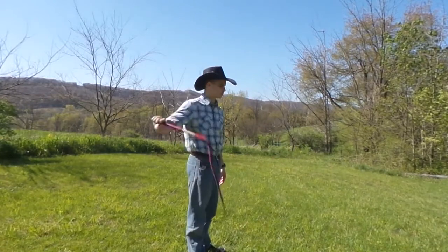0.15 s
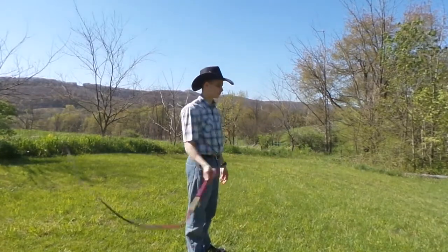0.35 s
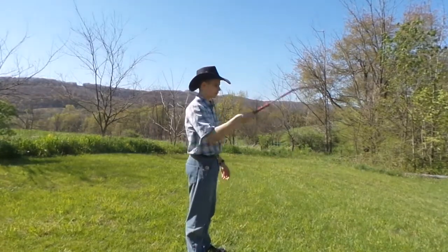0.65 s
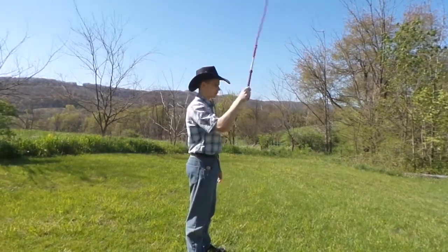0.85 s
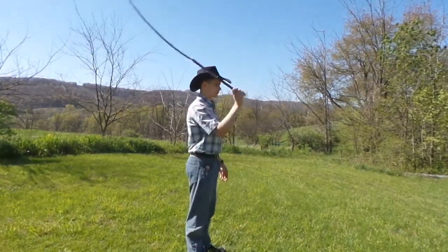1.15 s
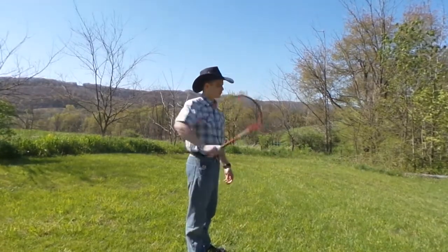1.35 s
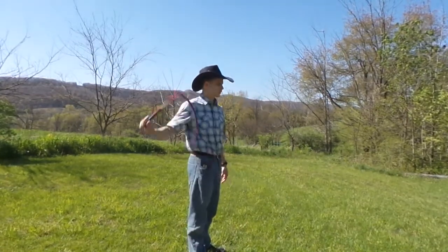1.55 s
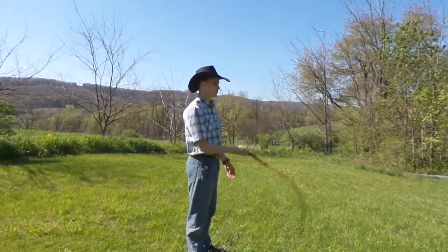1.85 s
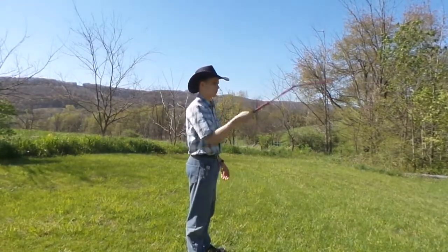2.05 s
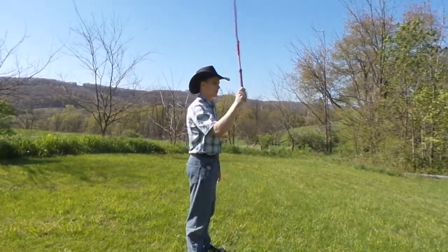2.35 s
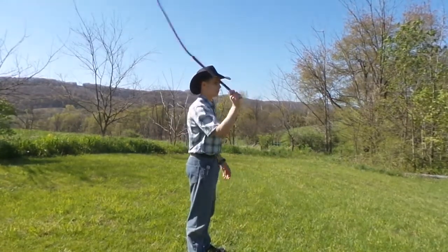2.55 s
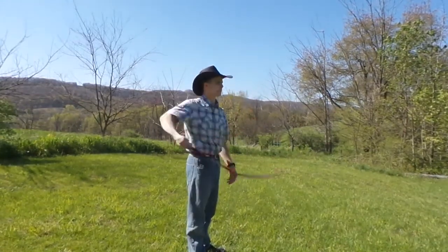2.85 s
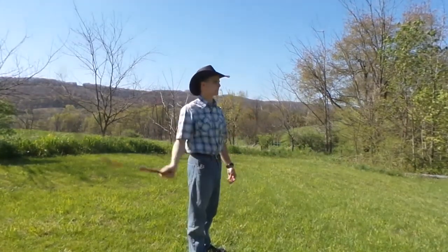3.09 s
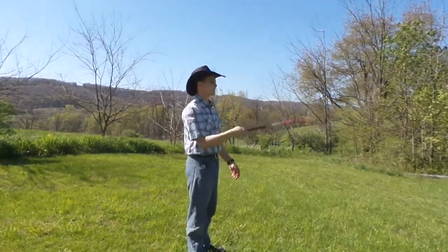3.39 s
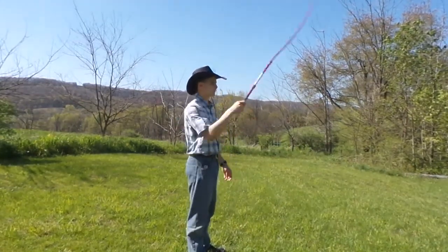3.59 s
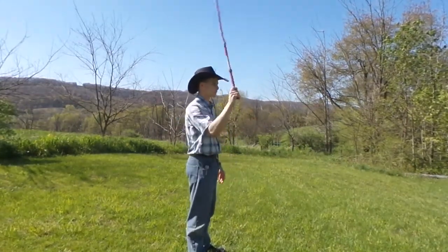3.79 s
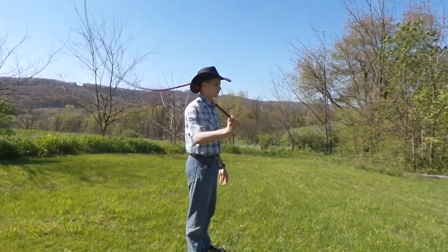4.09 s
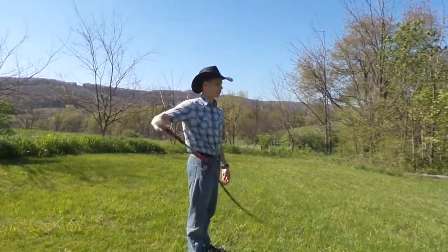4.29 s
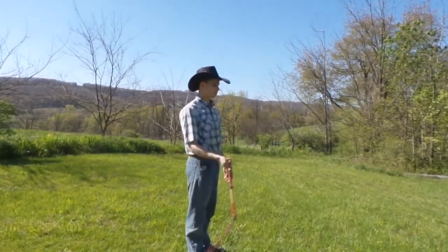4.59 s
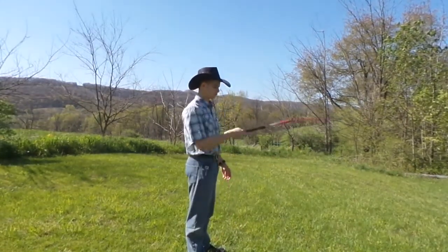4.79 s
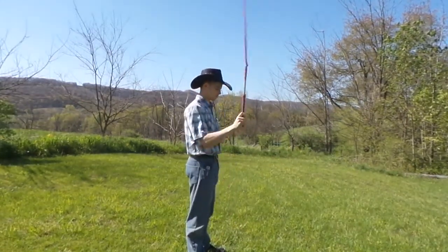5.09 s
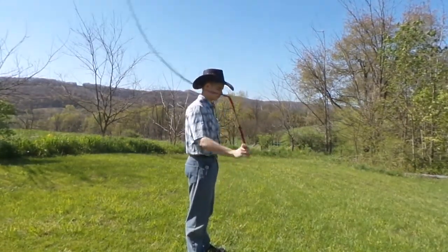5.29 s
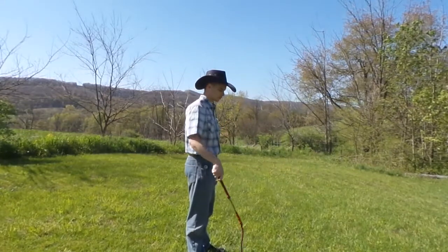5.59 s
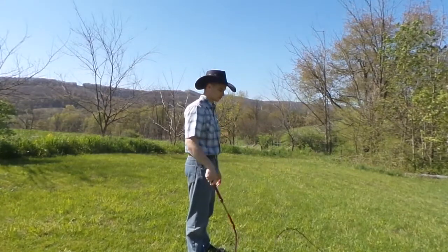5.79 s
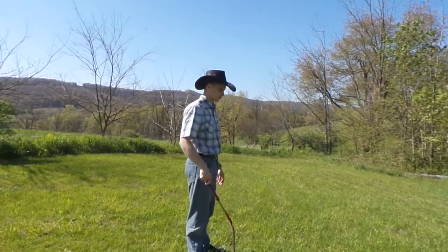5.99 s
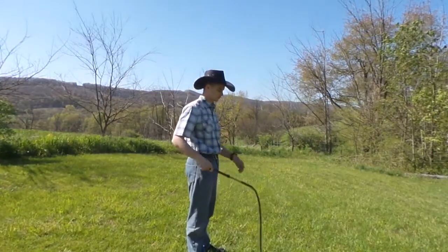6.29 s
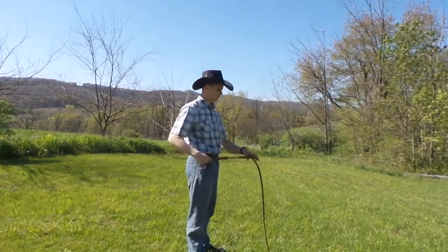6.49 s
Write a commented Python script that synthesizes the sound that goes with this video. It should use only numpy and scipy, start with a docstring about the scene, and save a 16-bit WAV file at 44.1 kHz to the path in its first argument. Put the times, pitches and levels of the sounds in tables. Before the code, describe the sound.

Pairs of sharp whip cracks with brief swishes and short echoes ring out in a breezy meadow over low, gusty wind rumble.

```python
"""In a breezy meadow, a long whip gives four pairs of cracks, behind then ahead, and a last soft one.
The thong (the whip's long cord) whistles through the air, and its tip makes a shock wave: the crack.
The ground, the grass and the tree lines send each crack back as a spray of small echoes.
Gusts rumble and pop against the microphone all the while. Near the end, clothes and thong rustle."""
import sys
import numpy as np
from scipy import signal
from scipy.fft import rfft, irfft
from scipy.io import wavfile
from scipy.ndimage import uniform_filter1d, map_coordinates

SR = 44100
rng = np.random.default_rng(int(sys.argv[2]) if len(sys.argv) > 2 else 0)


def persist_wave(psi):
    """Save psi, clipped to +-1, as 16-bit WAV."""
    counts = np.round(np.clip(psi, -1, 1) * 32767).astype(np.int16)
    wavfile.write(sys.argv[1], SR, np.atleast_2d(counts).T)


N = 293088

# A colour says how strong the low and high parts of a sound are.
# Each row: frequency in Hz, relative level in dB.
MEADOW_COLOUR = [(30, 6), (300, -2), (800, -7.5), (1500, -11), (3000, -29.5), (5000, -31), (9000, -30),
                 (12500, -29), (16000, -35.5)]  # the quiet of the meadow
FAR_HISS_COLOUR = [(1000, 0.5), (2200, 3), (4000, -6), (8000, -17), (16000, -23.5)]  # a distant hiss
RUMBLE_COLOUR = [(15, -19), (28, -12.5), (42, -11), (70, 2), (125, 5.5), (200, 0), (290, -10.5),
                 (420, -30.5), (800, -47), (2000, -79)]  # the deep part of the wind
FLUTTER_COLOUR = [(150, -8.5), (280, 9), (380, 3), (550, -8), (800, -17), (1200, -30.5), (2000, -48),
                  (4000, -77.5), (8000, -96)]  # the higher part of the wind
HISS_COLOUR = [(1500, -1.5), (3000, 6.5), (6000, 3.5), (9000, 3.5), (12500, 9.5), (16000, -5.5)]  # the whip's hiss and the rustle
TICK_COLOUR = [(1500, -9), (3500, 2), (7000, -9), (14000, -21)]  # a dry tick
RUSH_COLOUR = [(1000, -2), (2200, 4), (3200, -7), (5000, -12), (8000, -11), (12500, -5.5), (16000, -15.5)]  # air rushing past the thong
ECHO_COLOUR = [(300, -9.5), (800, -7), (1500, -0.5), (3000, 1.5), (5000, 3), (8000, -1.5), (10000, 3),
               (12500, 1.5), (15500, -5)]  # echoes from the land
SNAP_COLOUR = [(300, -16.5), (1000, -2), (2000, -6.5), (3500, -32), (6500, -8), (9500, -3), (12500, 2.5),
               (14500, -3), (16000, -19)]  # the snap of the frayed tip

# The far hiss swells and fades. Each row: time in seconds, level in dB.
FAR_HISS_LEVELS = [(0, -84.5), (2.4, -79.5), (2.9, -66), (3.9, -70), (4.35, -63), (5.1, -86.5), (6.65, -84)]
# The rustle as the whip is gathered. Each row: time in seconds, level in dB.
RUSTLE_LEVELS = [(5.85, -88), (6.0, -68.5), (6.15, -68.5), (6.21, -61), (6.27, -68), (6.32, -63),
                 (6.42, -78), (6.54, -63.5), (6.65, -78)]
# Gusts and lulls. Each row: time in seconds, then relative levels of rumble and flutter in dB.
GUSTS = [(0.0, -15, -31), (0.06, -22.5, -29.5), (0.09, -26.5, -34.5), (0.22, -31, -37.5),
         (0.31, -14.5, -20.5), (0.34, -19, -37), (0.39, -11, -13), (0.57, -18, -31), (0.84, -17.5, -28),
         (1.01, -10.5, -21), (1.3, -13, -15.5), (1.37, -27.5, -49), (1.46, -5, -11.5), (1.49, -12.5, -29.5),
         (1.65, -17.5, -27.5), (1.68, -25.5, -55), (1.87, -27.5, -24.5), (1.93, -18.5, -23.5),
         (2.0, -29, -39), (2.02, -15, -20.5), (2.1, -14, -17), (2.19, -22.5, -38.5), (2.31, -36.5, -47),
         (2.35, -22, -22.5), (2.43, -31, -35.5), (2.44, -39.5, -54.5), (2.47, -23, -17), (2.61, -20, -24),
         (2.66, -23, -41), (2.78, -17, -24), (2.83, -33, -48), (2.85, -17.5, -30), (2.93, -23.5, -41),
         (2.99, -12, -25.5), (3.35, -30.5, -45), (3.57, -20, -28), (3.7, -19, -31), (3.8, -31, -48),
         (3.86, -13.5, -19.5), (3.91, -33.5, -35), (4.04, -25, -34.5), (4.11, -29.5, -48.5),
         (4.17, -9.5, -22.5), (4.27, -29.5, -41.5), (4.31, -5, -19), (4.46, -37, -35.5), (4.52, -5.5, -15),
         (4.58, -17.5, -22), (4.9, -15, -11.5), (5.3, -23.5, -38), (5.33, -38, -55), (5.35, -18.5, -33),
         (5.39, -27.5, -47.5), (5.53, -9.5, -19), (5.6, -26, -44), (5.72, -14, -31.5), (5.89, -18, -24),
         (5.99, -25, -47), (6.11, -9, -16), (6.17, -27.5, -48), (6.41, -3.5, -15), (6.56, -19, -39.5),
         (6.59, -1.5, -11.5), (6.64, -17, -17.5)]
# The hardest eddies (small whirls of air). Each row: time in seconds, level in dB, core size in ms.
HARD_EDDIES = [(0.058, -7.5, 1.7), (0.293, -6, 1.2), (0.382, -7.5, 0.94), (0.645, -9.5, 0.83),
               (0.741, -16, 0.66), (0.967, -23, 0.37), (1.045, -7.5, 1.04), (1.278, -2.5, 1.2),
               (1.435, -15.5, 0.78), (2.029, -5.5, 1.7), (2.359, -13, 1.2), (2.524, -7, 1.4),
               (2.599, -8, 1.14), (3.116, -7.5, 1.57), (4.373, -0.5, 0.91), (4.549, 1.5, 1.23),
               (4.718, -1, 1.03), (4.83, -0.5, 1.04), (4.895, -1.5, 0.87), (5.05, -11, 0.76),
               (5.2, -5, 1.39), (5.486, -22.5, 0.45), (5.814, -1, 1.2), (6.091, -5.5, 1.84), (6.4, -1, 1.3),
               (6.592, -5, 0.72)]
# Ticks as the whip recoils. Each row: start in seconds, relative level in dB.
RECOIL_TICKS = [(.969, -46.5), (2.065, -36), (3.508, -35), (3.55, -50), (3.579, -31), (4.892, -33),
                (4.908, -37)]
# The swing that opens each throw. Each row: time of top speed in seconds, pitch then in Hz,
# then relative levels of whistle and rush in dB.
SWINGS = [(.172, 2180, -47, -59), (1.565, 2400, -45, -55.5), (3.013, 2150, -43, -50.5),
          (4.405, 2100, -47.5, -53), (5.597, 1900, -54.5, -63.5)]
# The tip turns over before a crack behind and after a crack ahead. Each row: time in seconds,
# top pitch in Hz, then relative levels of whistle and hiss in dB.
TIP_TURNS = [(0.207, 2030, -54, -44), (0.777, 3400, -43, -57), (1.604, 2610, -41, -43.5),
             (2.154, 3150, -43, -45.5), (3.031, 3634, -30, -38.5), (3.588, 3300, -52, -41),
             (4.42, 3030, -34.5, -46), (4.956, 3780, -44, -55), (5.639, 2070, -47.5, -47)]
# Echoes from the land behind and ahead. Each row: delay in seconds, relative level in dB,
# treble gain in dB.
ECHO_BEHIND = [(.002, -24.5, 0.5), (.012, -37.5, -1.5), (.04, -47, 3.5), (.05, -16.5, -22),
               (.068, -29, -19), (.085, -20, -14), (.11, -19, -23), (.14, -31, -20), (.25, -33, -31),
               (.42, -39, -43.5), (.9, -56.5, -47.5)]
ECHO_AHEAD = [(.002, -41, 2.5), (.014, -36, 9), (.023, -33.5, 9.5), (.04, -26.5, 0.5), (.065, -33.5, 1),
              (.097, -25.5, -8), (.135, -36.5, -8.5), (.19, -41, -18), (.28, -41, -29.5), (.43, -57.5, -40),
              (.9, -81.5, -52)]
# The cracks. Each row: time in seconds, shock in dB, snap in dB, snap fade time in ms, thump in dB,
# whistle in dB, echo in dB, stretch of the echo delays, aim (0 behind, 1 ahead). Levels are relative.
CRACKS = [(0.2673, -35, -5.5, 0.57, -39.5, -39.5, -7, 0.99, 0),
          (.4950, -4.5, -5.5, 0.72, -0.5, -36, 2.5, 0.98, 1),
          (1.642, -23.5, -8, 0.62, -11.5, -38, -1.5, 0.98, 0.15),
          (1.8386, -2, 3, 0.13, -40, -36.5, 3, 1.0, 0.82),
          (3.0822, -13.5, -9, 1, -36, -39.5, 2, 0.97, 0.088),
          (3.2973, 1.5, -1.5, 0.27, 1.5, -30, 4, 1.0, 0.95),
          (4.4778, -34, -9.5, 0.96, -26, -32, -2, 1.0, 0.12), (4.6656, 0.5, -3, 0.53, -40, -34, -3, 1, 1),
          (5.6939, -15, -13.5, 0.2, -10.5, -40, -1, 0.85, 0.077)]


def from_db(db):
    """Turns decibels into a number to multiply a sound by."""
    return 10 ** (np.asarray(db) / 20)


def rms_one(x):
    """Scales a sound so that its average strength (rms) is 1."""
    return x / np.sqrt(np.mean(x ** 2) + 1e-20)


def along(rows, t):
    """Reads a table's columns at times t, in straight lines between the rows."""
    times, *columns = np.transpose(rows)
    return np.array([np.interp(t, times, column) for column in columns])


def at_hz(colour, hz):
    """Reads a colour's level in dB at the given frequencies."""
    row_hz, db = np.transpose(colour)
    return np.interp(np.log(np.maximum(hz, 1)), np.log(row_hz), db)


def noise(colour, size=N):
    """Noise of a given colour, with strength 1."""
    hz = np.linspace(0, SR / 2, size // 2 + 1)
    spectrum = rfft(rng.standard_normal(size)) * from_db(at_hz(colour, hz))
    return rms_one(irfft(spectrum, size))


def low_pass(x, hz):
    """Gently dulls everything above hz."""
    return signal.sosfilt(signal.butter(2, min(hz, SR / 2 - 1), fs=SR, output="sos"), x + 1e-18)


def drift(rate_hz, size=N):
    """A smooth random wobble with strength 1."""
    return rms_one(low_pass(rng.standard_normal(size + SR // 4), rate_hz)[-size:])


def evened(x, size=1800):
    """Takes the slow swells out of a noise."""
    return x / np.sqrt(uniform_filter1d(x ** 2, size) + 1e-9)


def add(out, s, sound):
    """Mixes a sound into out, starting at s seconds."""
    start = max(round(s * SR), 0)
    out[start:start + len(sound)] += sound[:max(N - start, 0)]


def clock():
    """The time of every sample, in seconds."""
    return np.arange(N) / SR


def meadow():
    """A steady hush, with a far hiss that swells and fades."""
    hush = from_db(-57.5) * noise(MEADOW_COLOUR)
    return hush + from_db(along(FAR_HISS_LEVELS, clock())[0]) * noise(FAR_HISS_COLOUR)


def rustle():
    """Clothes and thong rub with an uneven hiss as the whip is gathered."""
    return from_db(along(RUSTLE_LEVELS, clock())[0]) * noise(HISS_COLOUR) * from_db(1.5 * drift(40))


def wind(surge_hz=55, buffet_hz=11):
    """Churning air passes the microphone, louder and higher when it surges; gusts break into buffets."""
    rumble_db, flutter_db = along(GUSTS, clock())
    surge = np.clip(drift(surge_hz), -2, 2)
    buffet = np.clip(drift(buffet_hz), -2, 1)
    travel = np.cumsum(np.exp(.15 * surge))  # faster air runs through the noise faster
    rumble = map_coordinates(noise(RUMBLE_COLOUR), [travel], mode="grid-wrap")
    flutter = map_coordinates(noise(FLUTTER_COLOUR), [travel], mode="grid-wrap")
    rumble = from_db(rumble_db - 2.76 + 1.58 * buffet) * evened(rumble * from_db(3.5 * surge))
    flutter = from_db(flutter_db - 3.14 + 1.45 * buffet) * evened(flutter * from_db(4 * surge))
    return rumble + flutter


def lesser_eddies(per_second=9, spread_db=2.0, core_ms=1.19):
    """Random eddies that follow the strength of the flutter, in rows like HARD_EDDIES."""
    when, strength, core = rng.uniform(-1, 1, (round(per_second * N / SR), 3)).T
    times = (when + 1) / 2 * N / SR
    db = along(GUSTS, times)[1] + 7 + spread_db * strength
    return list(zip(times, db, core_ms * np.exp(0.34 * core)))


def eddies():
    """Each passing whirl of air gives one swing of pressure; the smaller its core, the sharper the pop."""
    out, t = np.zeros(N), np.arange(-SR // 50, SR // 50) / SR
    whirls = list(HARD_EDDIES) + lesser_eddies()
    phases = rng.uniform(0, 2 * np.pi, len(whirls))
    for (s, db, core_ms), phase in zip(whirls, phases):
        pop = np.real(np.exp(1j * phase) / (1 + 1000j * t / core_ms) ** 3)
        add(out, s + t[0], from_db(db) * pop * np.hanning(len(t)))
    return out


def microphone_opening(pressure, limit=.85, leak_hz=30):
    """The microphone's opening rounds off the strongest buffets and lets the slowest swings leak away."""
    rounded = limit * np.tanh(pressure / limit)
    return signal.sosfilt(signal.butter(2, leak_hz, "high", fs=SR, output="sos"), rounded)


def ticks(fade_s=0.00066):
    """The recoiling whip gives faint, dry ticks, each gone in a millisecond or two."""
    out, t = np.zeros(N), np.arange(SR // 100) / SR
    for s, db in RECOIL_TICKS:
        add(out, s, from_db(db - 5.5) * noise(TICK_COLOUR, len(t)) * np.exp(-t / fade_s))
    return out


def whistle(pitch_hz):
    """Whirls of air peel off the thong and sing; the faster it moves, the higher and breathier the note."""
    size, phase = len(pitch_hz), 2 * np.pi * np.cumsum(pitch_hz) / SR
    spread = min((np.mean(pitch_hz) / 2300) ** 1.7, 2)

    def band(width_hz):
        """Noise gathered around the pitch."""
        return rms_one(drift(width_hz, size) * np.cos(phase) + drift(width_hz, size) * np.sin(phase))

    tone = band(105 * spread)
    breath = from_db(-6) * band(600 * spread)  # wider, because the thong tapers
    hiss = from_db(-14) * noise(HISS_COLOUR, size)
    swell = np.abs(np.sin(np.linspace(0, np.pi, size))) ** 0.55
    return from_db(-4) * swell * (tone + breath + hiss)


def swings(rise_s=0.03, fall_s=.052, end_pitch_ratio=0.57, rise_db_per_s=237.5, fall_db_per_s=29):
    """The thong speeds up and slows: its whistle rises and falls, and a rush of air builds and lingers."""
    whistles, rush, time = np.zeros(N), np.zeros(N), clock()
    t = np.arange(-rise_s, fall_s, 1 / SR)
    arch = end_pitch_ratio ** ((t / fall_s) ** 2)
    for s, top_hz, whistle_db, rush_db in SWINGS:
        add(whistles, s - rise_s, from_db(whistle_db) * whistle(top_hz * arch))
        below_peak_db = np.maximum((s - time) * rise_db_per_s, (time - s) * fall_db_per_s)
        rush += from_db(rush_db - below_peak_db)
    return whistles + rush * noise(RUSH_COLOUR)


def glide(start_s, db, length_s, from_hz, to_hz):
    """A whistle that slides from one pitch to another."""
    out = np.zeros(N)
    add(out, start_s, from_db(db) * whistle(np.geomspace(from_hz, to_hz, round(length_s * SR))))
    return out


def flick(s, db, half_length_s):
    """The loudness curve of the tip's brief hiss, inside a softer rush of the whole thong."""
    t = clock() - s
    peak = np.exp(-(t / half_length_s) ** 2)
    rush = from_db(-21) * np.exp(-(t / 0.014) ** 2)
    return from_db(db) * (peak + rush)


def tip():
    """The tip whistles upward and hisses into turns and cracks behind; into a crack ahead its note falls."""
    notes = glide(0.057, -60.5, length_s=0.1, from_hz=8000, to_hz=4000)  # one thin opening note
    hiss_level = np.zeros(N)
    for s, top_hz, whistle_db, hiss_db in TIP_TURNS:
        notes += glide(s - .022, whistle_db, length_s=.024, from_hz=.64 * top_hz, to_hz=top_hz)
        hiss_level += flick(s, hiss_db, half_length_s=.0037)
    for s, *_, whistle_db, _echo, _stretch, aim in CRACKS:
        if aim > .5:  # ahead
            notes += glide(s - .043, whistle_db, length_s=.041, from_hz=3400, to_hz=2400)
        else:  # behind: up into the crack, then down out of it
            notes += glide(s - .014, whistle_db + 2.5, length_s=.025, from_hz=3700, to_hz=5600)
            notes += glide(s + .008, whistle_db - 9, length_s=.028, from_hz=4150, to_hz=2700)
            hiss_level += flick(s - .0056, whistle_db - 3.5, half_length_s=.0083)
    return notes + hiss_level * noise(HISS_COLOUR)


def land_echoes(grain_db=2.0, grain_hz=700, patchy_db=2.5, treble_hz=9000):
    """Countless small echoes off grass, twigs and far trees; on long paths the air takes away treble."""
    delay, echoes = np.arange(SR) / SR, []
    for s, *_, echo_db, stretch, aim in CRACKS:
        behind, ahead = along(ECHO_BEHIND, delay / stretch), along(ECHO_AHEAD, delay / stretch)
        level_db, treble_db = behind + aim * (ahead - behind)
        echoes.append((s, echo_db + level_db, treble_db))
    # Two grainy noises take turns, so that neighbouring frequency bands do not cancel.
    twigs = rms_one(rng.standard_normal((2, N)) * from_db(grain_db * drift(grain_hz)))
    out, edges_hz = np.zeros(N), np.geomspace(300, 17000, 15)
    for k, (low, high) in enumerate(zip(edges_hz, edges_hz[1:])):
        hz, power = np.sqrt(low * high), np.zeros(N)
        for s, level_db, treble_db in echoes:
            add(power, s, from_db(level_db + treble_db * min(hz / treble_hz, 1)) ** 2)
        band = signal.sosfilt(signal.butter(2, [low, high], "band", fs=SR, output="sos"), twigs[k % 2])
        out += band * np.sqrt(power) * from_db(at_hz(ECHO_COLOUR, hz) + patchy_db * drift(49))
    return out


def ground_bounce(direct, delay_s=0.0049, grass_hz=3000, dull_db=-11, bright_db=-28):
    """The ground returns a slightly late copy, with most of its treble lost in the grass."""
    out = np.zeros(N)
    above_bass = direct - low_pass(direct, 500)
    dull = from_db(dull_db) * low_pass(above_bass, grass_hz)
    add(out, delay_s, dull + from_db(bright_db) * above_bass)
    return out


def cracks(shock_ms=0.11, thump_hz=105, thump_ms=7.0):
    """The tip makes an N-shaped shock wave inside a noisy snap; the blast makes the microphone thump."""
    out, ms = np.zeros(N), np.arange(-SR // 200, SR // 40) * 1000 / SR
    shock_time = 2 * ms / shock_ms
    shock = -shock_time * np.exp((1 - shock_time ** 4) / 4)
    ring = np.exp(-np.abs(ms) / thump_ms) * np.cos(2 * np.pi * thump_hz * ms / 1000)
    thump = low_pass((ms > 0) * ring, 2500)
    for s, shock_db, snap_db, snap_ms, thump_db, *_ in CRACKS:
        fade = np.exp(-np.abs(ms) / snap_ms)
        snap = rms_one(noise(SNAP_COLOUR, len(ms)) * fade) * np.sqrt(np.mean(fade ** 2))
        crack = from_db(shock_db) * shock + from_db(snap_db) * snap + from_db(thump_db) * thump
        add(out, s + ms[0] / 1000, crack)
    return out


def scene():
    """The whip, its echoes, the meadow and the wind, mixed into one channel."""
    direct = cracks()
    whip = direct + ground_bounce(direct) + land_echoes() + swings() + tip() + ticks()
    background = rustle() + meadow() + microphone_opening(wind() + eddies())
    return (whip + background)[None]


def record(dry):
    """The loudest cracks overload the microphone, and the treble above 16000 Hz is cut."""
    clipped = np.clip(dry, -.95, .95)
    return signal.sosfilt(signal.ellip(10, .1, 80, 16000, fs=SR, output="sos"), clipped)


dry = scene()
out = record(dry)
persist_wave(out)
```